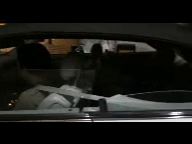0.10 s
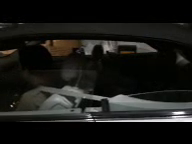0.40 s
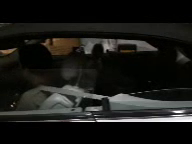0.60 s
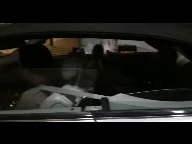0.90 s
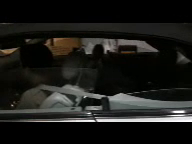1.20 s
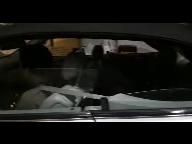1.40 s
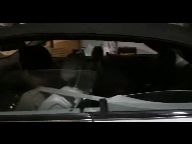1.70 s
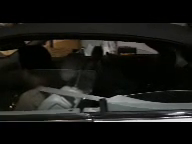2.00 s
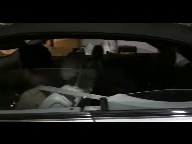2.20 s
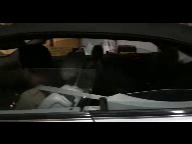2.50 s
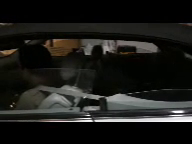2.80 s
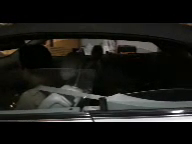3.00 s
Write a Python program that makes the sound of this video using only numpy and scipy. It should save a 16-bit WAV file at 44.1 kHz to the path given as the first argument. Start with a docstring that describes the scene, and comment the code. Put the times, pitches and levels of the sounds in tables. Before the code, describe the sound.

Steady electric motor whir of a folding car roof, light knocks, ending in a hard clunk.

```python
"""In a closed garage, heard from close by, a folding car roof is at work. Its motor hums at multiples of
the shaft rate and its gears whine: sines on unsteady pitches. The motor's rush is coloured noise, raised
at the resonances of the body panels. Linkages knock softly and a latch slams home: decaying modes of
the frame. The latch scrapes: short bursts of grainy noise. A dull room tail follows knocks and scrapes."""
import sys
import numpy as np
from scipy import signal
from scipy.fft import rfft, irfft
from scipy.io import wavfile
from scipy.ndimage import uniform_filter1d

SR = 44100
rng = np.random.default_rng(int(sys.argv[2]) if len(sys.argv) > 2 else 0)


def field_ratio(decibels):
    """Amplitude ratio for a level in dB (20 dB per decade); scalars and array-likes work."""
    return 10 ** (np.asarray(decibels, dtype=float) / 20)


def store_pcm(level_fs):
    """Save levels as 16-bit WAV."""
    pcm = np.round(np.clip(level_fs, -1, 1) * 32767).astype(np.int16)
    wavfile.write(sys.argv[1], SR, np.atleast_2d(pcm).T)


N = 140679

# Spectral shape of the motor's rush. Each row: frequency in Hz, relative density in dB per Hz.
RUSH_SHAPE = [(22, -54), (45, -28), (62, -22), (100, -16.5), (160, -8), (330, -10.5), (500, -10.5),
              (590, -14.5), (780, -10.5), (1050, -10), (1300, -5.5), (1850, -8.5), (2050, -9.5),
              (2500, -14), (3200, -16), (4700, -25), (5150, -32), (6000, -28.5), (7700, -27), (9000, -33.5),
              (9600, -40.5), (10100, -87)]
# Course of the rush. Each row: time in seconds, nominal rms level of its 1 to 3 kHz part in dB.
RUSH_LEVEL = [(.2, -36), (1., -36), (1.8, -36.5), (2.4, -36), (2.9, -36), (3.19, -35)]
# Body panel resonances in the rush. Each row: frequency in Hz, width in Hz, gain in dB.
PANELS = [(266, 26, 9), (493.6, 32.5, 8), (646.5, 50, 7), (372, 16, 6.5), (220, 15, 1.5), (914, 13, 4.5),
          (1237, 53, 3.5), (1379, 58, 5.5), (1647, 98, 3.5), (1792, 54, 8.5)]
# Harmonics of the motor shaft. Each row: multiple of the shaft rate, nominal rms level in dB.
SHAFT_HARMONICS = [(1, -59.5), (2, -53), (3, -54.5)]
# Gear whine. Each row: time in seconds, nominal mesh rate in Hz, then for each multiple of that rate
# its nominal rms level in dB.
GEAR_WHINE = [(.3, 534.6, -65, -68, -54, -68, -64.5), (.55, 531, -62, -61, -56, -69, -72),
              (.8, 534.4, -62, -63, -48, -76, -68.5), (1.05, 536, -61, -65, -49.5, -55.5, -73),
              (1.3, 529, -71, -56, -50, -60, -69), (1.55, 534.3, -60, -47, -60, -57, -80),
              (1.85, 537.4, -59, -68, -58, -55, -93), (2.08, 536, -54, -48.5, -63, -65, -81),
              (2.3, 544.3, -45.5, -48, -58, -71, -85), (2.55, 546, -47, -55, -68, -64, -84),
              (2.8, 545, -51.5, -51.5, -65, -75, -82), (3.19, 551, -56, -57, -72, -75, -83)]
# Multiples of the mesh rate, in the order of the level columns above.
WHINE_MULTIPLES = (1, 2, 4, 6, 11)
# Second gear tone. Each row: time in seconds, nominal frequency in Hz, nominal rms level in dB.
LOW_WHINE = [(.3, 428, -69), (.8, 431, -62), (1.3, 422.6, -50), (1.8, 426.5, -57), (2.3, 423.4, -53),
             (2.9, 425.3, -55)]
# Steady hums. Each row: nominal frequency in Hz, nominal rms level in dB, waver of the level in dB.
HUMS = [(255.1, -48, 0.5), (661.7, -56, 3), (488.3, -56.5, 6.5)]
# Modes of the frame. Each row: nominal frequency in Hz, relative level in dB, full t60 in seconds.
FRAME_MODES = [(55, 1.5, 0.22), (71, -5, .15), (85, 5, 0.14), (102, 4.5, .2), (121, -4, 0.44),
               (157.8, 0, 0.2), (188, -0.5, 0.11), (219.7, -7.5, 0.34), (246, -1, 0.14), (306.4, 0.5, 0.17),
               (346.2, -6, 0.21), (402, 1.5, 0.17), (450, -8.5, 0.093), (523, -6, 0.18), (612, 2.5, 0.13),
               (928, -3, 0.16), (1310, -13, 0.065), (1810, -11.5, 0.06), (2200, 1, 0.073)]
# Knocks of linkages and latch. Each row: start in seconds, peak level before the low cut in dB,
# centre of the push in Hz, width of the push in octaves, share of the modes' full t60.
KNOCKS = [(1.242, -28, 400, 0.24, 0.54), (1.252, -37.5, 270, 0.35, .5), (1.266, -31, 198, 0.47, 0.38),
          (1.281, -33, 188, 0.22, 0.43), (1.851, -27.5, 97, 0.33, 0.47), (1.854, -34.5, 300, 0.18, 0.45),
          (1.872, -31.5, 91, 0.38, 0.64), (1.878, -36, 180, 0.3, .5), (1.899, -38, 85, 0.38, 0.46),
          (1.906, -31.5, 300, 0.53, 0.31), (1.94, -38, 80, 0.35, 0.45), (1.985, -32.5, 60, 0.5, 0.58),
          (2.029, -37, 120, 0.44, 0.47), (2.125, -33.5, 197, 0.47, 0.34), (2.961, -28.5, 612, .3, 0.94),
          (2.975, -22, 900, 0.76, 0.34), (2.98, -30, 1490, .6, 0.6), (2.989, -31, 700, 1, 0.86),
          (3.0, -38, 1490, 0.88, 0.44), (3.042, -18, 600, 0.45, 0.93), (3.046, -12, 280, 0.42, 0.72),
          (3.047, -14, 148, 0.26, 0.51), (3.049, -15, 1120, 0.76, 0.4), (3.06, -16, 225, 0.73, 0.62),
          (3.074, -20, 400, 0.21, 0.63), (3.083, -18.5, 277, 0.62, 0.58), (3.097, -22.5, 134, 0.31, 0.57),
          (3.121, -23, 250, 0.92, 0.7), (3.145, -35, 134, 0.4, .8), (3.172, -27, 170, 0.79, .8)]
# Latch scrapes. Each row: start in seconds, time from start to release in seconds, rms level of the # noise
# after its two resonators but before envelope, treble step and low cut in dB, centre in Hz, width of # each of
# two resonators in Hz.
SCRAPES = [(2.958, 0.0064, -35.5, 2500, 3500), (2.979, 0.01, -32, 1710, 2200),
           (2.982, 0.021, -34.5, 1620, 2200), (3.021, 0.018, -44.5, 2500, 3500),
           (3.045, 0.0058, -40, 2500, 3500), (3.045, 0.0094, -25.5, 1610, 1910),
           (3.065, 0.034, -35, 1400, 2000), (1.789, 0.047, -43, 2180, 1980)]


def curve(table, col):
    """Linear interpolation of one table column against time."""
    table = np.array(table)
    return np.interp(np.arange(N) / SR, table[:, 0], table[:, col])


def walk(rate):
    """Slow random modulation: levels held for 1 / rate seconds, smoothed twice; spread near 1."""
    hold = int(SR / rate)
    steps = np.repeat(rng.standard_normal(N // hold + 1), hold)
    smooth = uniform_filter1d(uniform_filter1d(steps, hold), hold)
    return 1.093 * smooth[:N]


def tone(hz, phase=0.):
    """Phase is the integral of frequency: a sine of rms 1 on a moving pitch."""
    return np.sqrt(2) * np.sin(2 * np.pi * np.cumsum(hz) / SR + phase)


def motor_rush():
    """Resonant colouring of broadband noise: panels raise narrow bands, half-octave bands flicker."""
    flicker_db, swell_db = 1, 0.3
    f = np.maximum(np.arange(N // 2 + 1) * SR / N, 1.)
    shape = np.array(RUSH_SHAPE)
    gain = field_ratio(np.interp(np.log(f), np.log(shape[:, 0]), shape[:, 1]))
    for hz, width, db in PANELS:
        resonance = 1 / (1 + (2 * (f - hz) / width) ** 2)
        gain = gain * (1 + (field_ratio(db) - 1) * resonance)
    spectrum = rfft(rng.standard_normal(N)) * gain
    half_octaves = 2 * np.log2(f / 30)
    out = np.zeros(N)
    for k in range(18):
        overlap = np.clip(1 - abs(half_octaves - k), 0, 1)  # neighbouring bands crossfade
        out = out + irfft(spectrum * overlap, N) * field_ratio(flicker_db * walk(18))
    middle = irfft(spectrum * (f > 1000) * (f < 3000), N)  # level reference, without flicker
    return out / np.std(middle) * field_ratio(curve(RUSH_LEVEL, col=1) + swell_db * walk(5.17))


def shaft_hum():
    """Periodic rotation yields harmonics of the shaft rate, which share its drift in speed."""
    shaft_hz = 39.8 * (1 + 0.004 * walk(3))
    out = np.zeros(N)
    for multiple, db in SHAFT_HARMONICS:
        level = field_ratio(db + 0.51 * walk(11))
        out = out + level * tone(multiple * shaft_hz, rng.uniform(0, 7.9))
    return out


def gear_whine():
    """Tooth meshing radiates multiples of the mesh rate, the listed later ones wavering more in level."""
    mesh_hz = curve(GEAR_WHINE, col=1) * (1 + 0.00083 * walk(10.05))
    out = np.zeros(N)
    for i, multiple in enumerate(WHINE_MULTIPLES):
        waver_db = 1.4 + 0.8 * i
        level = field_ratio(curve(GEAR_WHINE, col=2 + i) + waver_db * walk(11.14))
        out = out + level * tone(multiple * mesh_hz)
    return out


def low_gear_tone():
    """A second gear tone is a single sinusoid, modulated in both frequency and amplitude."""
    hz = curve(LOW_WHINE, col=1) * (1 + 0.004 * walk(10))
    return field_ratio(curve(LOW_WHINE, col=2) + 3.7 * walk(6.3)) * tone(hz)


def steady_hums():
    """Narrow-band tones: slight random frequency and amplitude modulation broadens each sine."""
    out = np.zeros(N)
    for hz, db, waver_db in HUMS:
        level = field_ratio(db + waver_db * walk(9.94))
        out = out + level * tone(hz * (1 + 0.00443 * walk(8.03)))
    return out


def knocks():
    """Modal excitation: each push rings the frame modes near its centre, and they decay exponentially."""
    out, t = np.zeros(N + SR), np.arange(SR // 2) / SR
    hz, db, t60 = np.array(FRAME_MODES).T[:, :, None]
    sign = (-1.) ** np.arange(len(FRAME_MODES))[:, None]
    scatter = rng.standard_normal((len(KNOCKS), 2, len(FRAME_MODES), 1))
    for (start, peak_db, centre, width, ring), (level_db, detune) in zip(KNOCKS, scatter):
        push = np.exp(-0.5 * (np.log2(hz / centre) / width) ** 2)
        size = sign * field_ratio(db + level_db) * push
        decay = np.exp(-np.log(1000) * t / (t60 * ring))
        modes = size * decay * np.sin(2 * np.pi * hz * (1 + 0.021 * detune) * t)
        x = modes.sum(axis=0)
        x = x * np.clip(t * centre / 0.35, 0, 1)  # the push builds over about a third of a cycle
        i = int(start * SR)
        out[i:i + len(t)] += x / abs(x).max() * field_ratio(peak_db)
    return out[:N]


def garage(x):
    """Diffuse reverberation: convolution with decaying noise gives the dull tail of a closed room."""
    t60_s, rise_s, level_db, bottom_hz, top_hz = 0.39, 0.0058, -14, 80, 2500
    t = np.arange(SR) / SR
    envelope = np.exp(-np.log(1000) * t / t60_s) * np.clip(t / rise_s, 0, 1)
    tail = rng.standard_normal(SR) * envelope
    tail = signal.lfilter(*signal.butter(1, [bottom_hz, top_hz], "band", fs=SR), tail)
    tail = tail / np.sqrt(np.sum(tail ** 2))
    return signal.fftconvolve(x, tail)[:N] * field_ratio(level_db)


def scrapes():
    """Friction noise: resonant grainy rubs with a quick rise, a hold and an exponential release."""
    rise_s, release_s, grit_db = 0.0011, 0.012, 5
    top_hz, above_db = 4920, -5.5  # the treble steps down above this edge
    out, t = np.zeros(N), np.arange(N) / SR
    for start, length, db, hz, width in SCRAPES:
        grit = rng.standard_normal(N) * field_ratio(grit_db * walk(500))
        resonator = signal.iirpeak(hz, hz / width, SR)
        grit = signal.lfilter(*resonator, signal.lfilter(*resonator, grit))
        grit = grit / np.sqrt(np.mean(grit ** 2))
        rise = np.clip((t - start) / rise_s, 0, 1)
        release = np.exp(-np.maximum(t - start - length, 0) / release_s)
        out += grit * field_ratio(db) * rise * release
    above = np.arange(N // 2 + 1) * SR / N > top_hz
    return irfft(rfft(out) * field_ratio(above_db * above), N)


def scene():
    """Superposition of the motor's sounds with the knocks and scrapes and their room tail."""
    motor = motor_rush() + shaft_hum() + gear_whine() + low_gear_tone() + steady_hums()
    low_cut = signal.butter(2, 45, "high", fs=SR)  # the knocks and scrapes lose their deepest lows below this, in Hz
    hits = signal.lfilter(*low_cut, knocks() + scrapes())
    return (motor + hits + garage(hits))[None]


def roll_off(x):
    """The treble ends steeply here."""
    return signal.sosfilt(signal.butter(12, 9980, fs=SR, output="sos"), x)


def record(dry):
    """Amplitude envelope: after a silent lead the sound fades in quickly, steepest at its start."""
    start_s, fade_in_s = 0.13, 0.051
    fade = np.clip((np.arange(N) / SR - start_s) / fade_in_s, 0, 1) ** 0.38
    return roll_off(dry * fade)


dry = scene()
out = record(dry)
store_pcm(out)
```